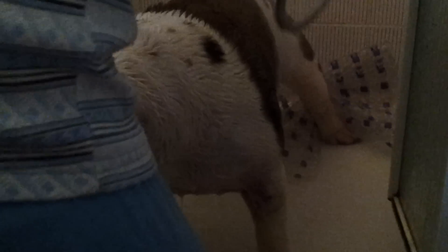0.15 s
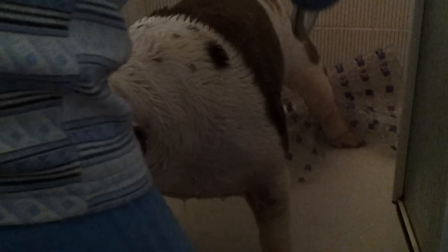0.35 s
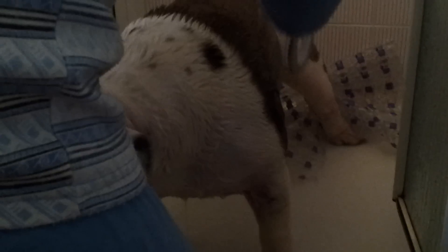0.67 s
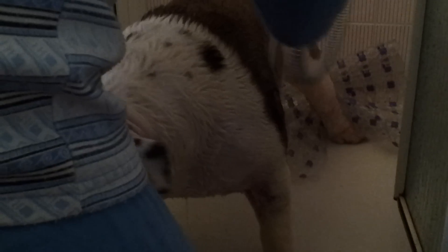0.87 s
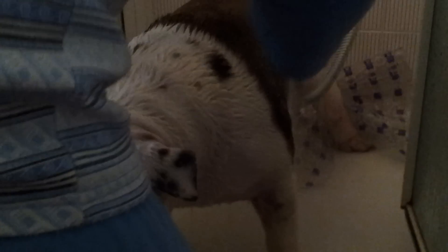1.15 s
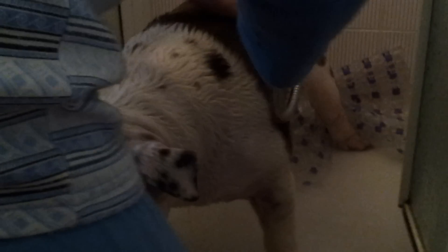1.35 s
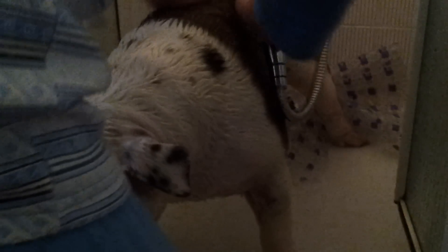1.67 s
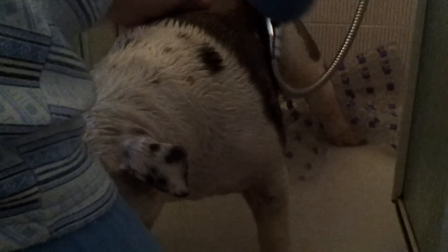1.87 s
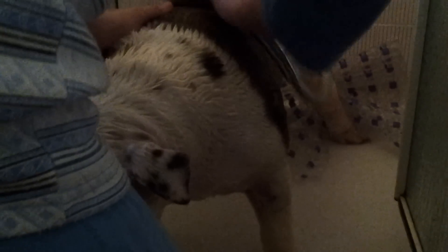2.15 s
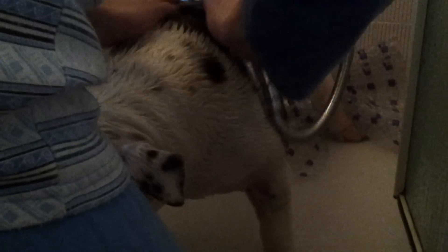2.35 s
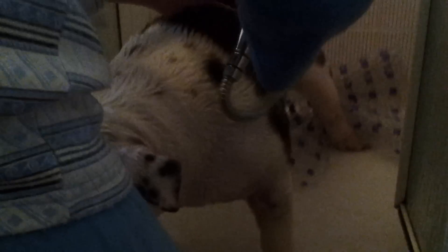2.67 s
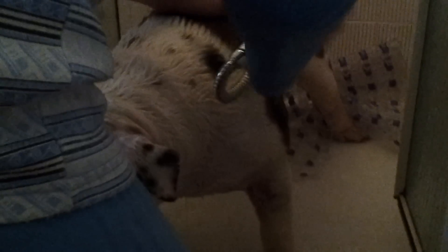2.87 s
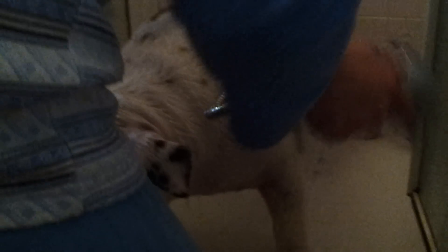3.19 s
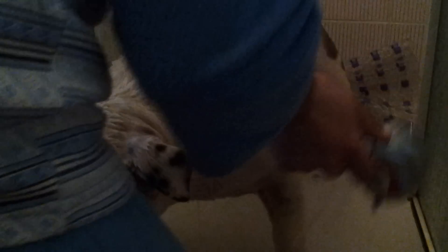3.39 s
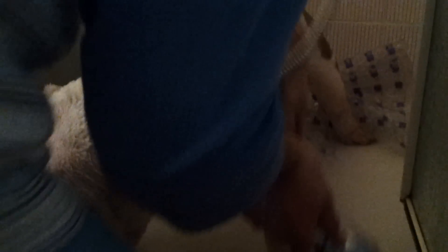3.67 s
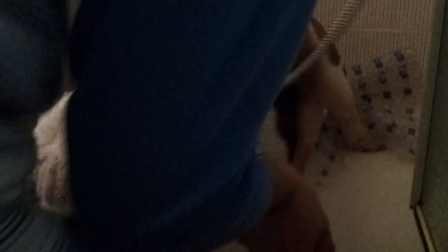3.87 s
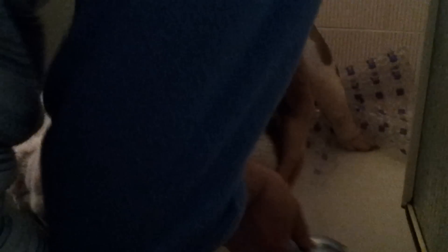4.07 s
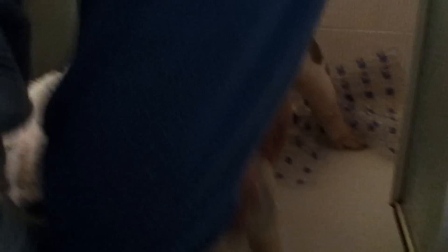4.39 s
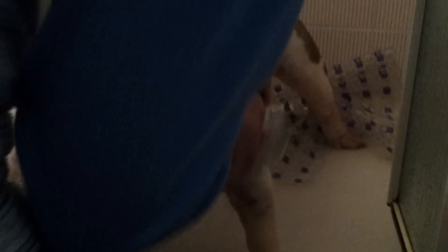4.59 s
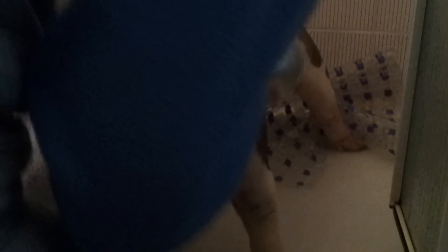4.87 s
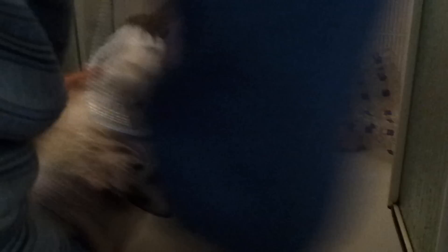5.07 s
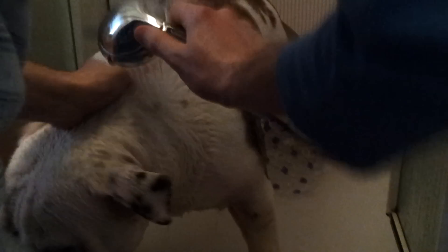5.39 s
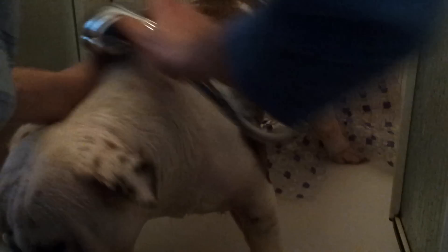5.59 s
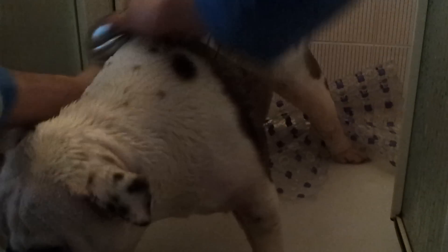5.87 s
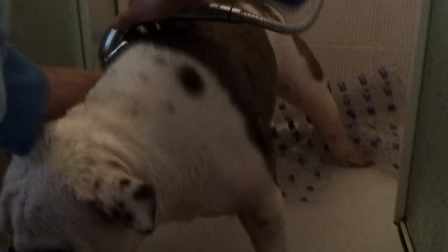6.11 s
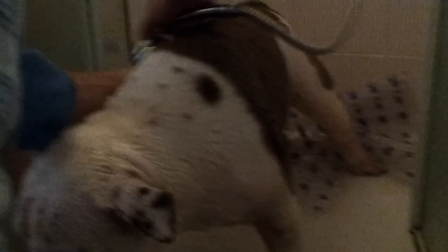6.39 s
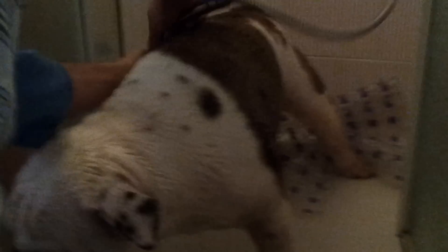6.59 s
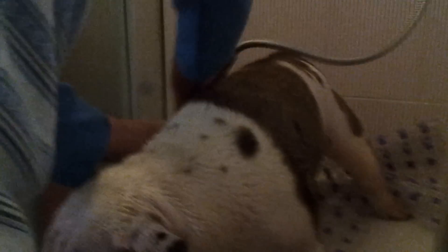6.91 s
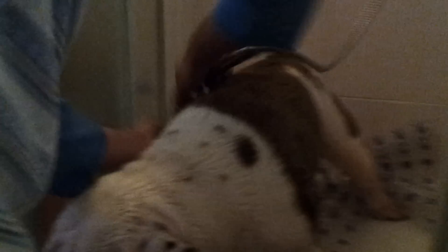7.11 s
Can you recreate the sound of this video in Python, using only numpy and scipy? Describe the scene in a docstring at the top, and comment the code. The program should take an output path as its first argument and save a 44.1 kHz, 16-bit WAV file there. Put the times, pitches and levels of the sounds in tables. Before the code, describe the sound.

In a small, hard tiled shower stall, a hand shower sprays a wet dog close to a narrow-band mono microphone. A dense, bright hiss runs throughout, rising and dipping as the jet moves. From 0 to 0.5 s sharp drops spit and crackle, with a soft low handling bump near 0.3. Around 0.8 to 2 s the coat splash grows, a narrow singing tone colours the spray and water gushes onto the tray, strongest near 1.2. More spits fall at 1.4 to 2.1; splash swells at 2.8 and 3.4. At 3.8 s the shower head knocks loudly: a hard, overloaded crack, hollow panel ring and boom, with weaker rebounds until 3.9. Spraying continues, with a drumming gush near 4.5, quieter swishes after 5, and a fuller splash at 6.4 with light spatters to the end at about 7.2. Gurgling run-off lies underneath.

```python
"""In a small tiled stall, a hand shower sprays a dog close to a mono microphone.
Fine drops hiss and the wet coat splashes: both are random impacts plus short rings, coloured by a spectrum.
Hollows in the coat swish and run-off gurgles as moving resonances; water drums on the tray, at times in a gush.
Large drops spit as short tones, droplets spatter as fading noise, and soft low bumps are short swelling tones.
Once the shower head knocks hard against the stall and rebounds: a noise crack, ringing panel tones and a boom."""
import sys
import numpy as np
from scipy import signal
from scipy.io import wavfile

SR = 44100
rng = np.random.default_rng(int(sys.argv[2]) if len(sys.argv) > 2 else 0)


def dump_mix(stems):
    """Bounce the given channels to the path in sys.argv[1] as a 16-bit WAV at rate SR."""
    frames = np.atleast_2d(stems).T  # one column per channel
    limited = np.clip(frames, -1, 1)  # hard clip at full scale
    pcm = np.round(limited * 32767).astype(np.int16)
    wavfile.write(sys.argv[1], SR, pcm)


N = 319512
TIME = np.arange(N) / SR


def amp(db):
    """Turns decibels into a plain gain."""
    return 10 ** (np.asarray(db) / 20)


def unit(x):
    """Scales to rms 1."""
    return x / np.sqrt(np.mean(x ** 2) + 1e-20)


def read(points, hz):
    """Reads a frequency table on a log-frequency axis."""
    f, value = np.transpose(points)
    return np.interp(np.log(hz + 1), np.log(f), value)


def curves(rows):
    """Draws straight lines through each column of a time table."""
    s, *columns = np.transpose(rows)
    return [np.interp(TIME, s, c) for c in columns]


def add(mix, s, sound):
    """Adds a sound to the mix, starting at s seconds."""
    part = mix[max(round(s * SR), 0):][:len(sound)]
    part += sound[:len(part)]


def colour(x, points, size=4096):
    """Filters to a spectrum without sounding early, so that clicks keep their sharp front."""
    log_gain = np.log(amp(read(points, abs(np.fft.fftfreq(size, 1 / SR)))))
    taps = np.fft.ifft(np.exp(np.conj(signal.hilbert(log_gain)))).real
    return signal.fftconvolve(x, taps[:size // 2])[:len(x)]


def low_pass(x, hz):
    """Steeply removes what lies above hz."""
    taps = signal.firwin(301, hz, window=("kaiser", 9), fs=SR)
    return signal.oaconvolve(x, taps[None], "same")


def resonate(x, hz, width_hz):
    """A two-stage resonance that follows the pitch hz."""
    turn = np.exp(2j * np.pi * np.cumsum(hz * np.ones(len(x))) / SR)
    r = np.exp(-np.pi * width_hz / SR)
    # shift the pitch down to zero, smooth, and shift it back up
    smooth = signal.lfilter([(1 - r) ** 2], [1, -2 * r, r * r], x / turn)
    return (turn * smooth).real


def drops(per_s, spread_db, mist):
    """Impacts of random moment and size over a mist too fine to tell apart."""
    size = amp(spread_db * np.minimum(rng.exponential(1, N), 4))
    hits = size * rng.choice([-1, 1], N) * (rng.random(N) < per_s / SR)
    return unit(unit(hits) + mist * rng.standard_normal(N))


def plinks(per_s, low_hz, high_hz, cycles, spread_db, size=600):
    """Each drop rings for a few cycles at a pitch of its own."""
    count = int(per_s * N / SR)
    when, pitch, chance, phase = rng.random((count, 4)).T[:, :, None]
    hz, k = low_hz + (high_hz - low_hz) * pitch, np.arange(size)
    height = amp(spread_db * np.minimum(-np.log(1 - chance), 4)) * np.sqrt(hz)
    turns = (hz * k / SR).astype(np.float32)
    fade = np.minimum(turns, 1) * np.exp(-turns / cycles) * (1 - k / size)
    rings = height * fade * np.sin(2 * np.pi * (turns + phase.astype(np.float32)))
    places = (when * N).astype(int) + k
    return unit(np.bincount(places.ravel(), rings.ravel())[:N])


def flutter(x, patch_db, bins, frames, size):
    """Random patches, bins wide and frames long, make the sound louder or softer."""
    overlap = size - size // 4
    z = signal.stft(x, nperseg=size, noverlap=overlap)[2]
    blob = np.outer(np.hanning(bins), np.hanning(frames))
    patches = unit(signal.fftconvolve(rng.standard_normal(z.shape), blob, "same"))
    return unit(signal.istft(z * amp(patch_db * patches), nperseg=size, noverlap=overlap)[1][:N])


# shares of a swell's length spent rising and falling
RISE_SHARE, FALL_SHARE = 0.27, 0.5


def swells(rows):
    """Gain that rises, holds and falls once for each row (time [s], length [s], level [dB])."""
    gain = np.zeros(N)
    for s, length, db in rows:
        u = np.linspace(0, 1, max(round(length * SR), 2))
        ramp = np.clip(np.minimum(u / RISE_SHARE, (1 - u) / FALL_SHARE), 0, 1)
        add(gain, s, amp(db) * np.sin(np.pi / 2 * ramp))
    return gain


def waver(low_hz, high_hz, count=24):
    """Random unsteadiness from a sum of slow waves, rms 1."""
    t = np.linspace(0, N / SR, 1500)
    rates = np.geomspace(low_hz, high_hz, count)
    drift = sum(np.sin(2 * np.pi * (hz * t + rng.random())) / np.sqrt(hz) for hz in rates)
    return unit(np.interp(TIME, t, drift))


# how long the tiled stall rings: (frequency [Hz], time to fall by 60 dB [s])
STALL_RING = [(100, 1), (300, 0.55), (1000, 0.56), (2500, 0.83), (8000, 0.14)]


def stall_tail():
    """Dense echoes off the tiles, each band dying at its own speed; energy 1."""
    echoes = rng.choice([-1., 1.], SR) * (rng.random(SR) < .2)
    hz, t, z = signal.stft(echoes, SR, nperseg=256)
    fade = amp(-60 * t / read(STALL_RING, hz)[:, None])
    tail = signal.istft(z * fade, SR, nperseg=256)[1]
    return tail / np.linalg.norm(tail)


def in_stall(x, wet_db):
    """Direct sound plus the ring of the stall, scaled to keep about the same power."""
    ring = signal.fftconvolve(x, stall_tail())[:N]
    return (x + amp(wet_db) * ring) / np.hypot(1, amp(wet_db))


# colour of the fine drops, also used for spits and spatters: (frequency [Hz], relative level per Hz [dB])
HISS_COLOUR = [(400, -40.5), (900, -14), (1400, -16), (1900, -3), (2300, -6), (2800, -10), (3300, -6.5),
               (4000, -2.5), (5000, -2), (6300, 1), (7000, -1.5), (7500, -9.5), (8000, -25), (8500, -24),
               (9200, -38)]
# colour of the splash in the wet coat: (frequency [Hz], relative level per Hz [dB])
SPLASH_COLOUR = [(300, -36), (520, -24), (800, -12), (1100, -5), (1600, 0), (2100, -7.5), (2700, -6.5),
                 (4000, -9), (7000, -26), (9000, -60.5)]
# the jet's fine hiss as the shower head moves: (time [s], level [dB])
JET_LEVEL = [(0, -26), (0.6, -26.5), (0.95, -27), (1.3, -23.5), (1.58, -28), (2.02, -26.5), (2.2, -29.5),
             (2.5, -29), (2.98, -27), (3.4, -24), (3.72, -25.5), (3.93, -24), (4.6, -28), (5.18, -27.5),
             (5.75, -29), (6.3, -29.3), (6.45, -26), (7.25, -27)]
# the jet sweeps past the dog onto bare tile: (time [s], length [s], hiss level [dB])
TILE_SWEEPS = [(.02, 0.054, -29.5), (1.19, 0.12, -24), (1.66, .09, -24.5), (2.5, 0.087, -31.5),
               (2.68, 0.089, -27.5), (3.11, 0.081, -25.5), (6.02, 0.2, -30), (6.34, 0.057, -26),
               (6.83, 0.066, -27.5)]
# the splash in the coat, before a small trim: (time [s], level [dB])
COAT_LEVEL = [(0.0, -42.0), (1.03, -34.5), (1.4, -34), (1.83, -41), (2.55, -43), (2.8, -32.5),
              (3.18, -40.5), (3.4, -31.5), (3.55, -45.5), (3.68, -48), (3.85, -41), (4.3, -40.5),
              (4.45, -36.5), (4.85, -38.5), (5.33, -34), (6.38, -36), (6.45, -30.5), (7.25, -36.5)]


def spray(hiss_plink_db=-10.0, splash_plink_db=-7, splash_trim_db=-.5, unsteady_db=0.23):
    """Many small impacts hiss, and the wet coat splashes and bubbles at lower pitches."""
    hiss = drops(per_s=4000, spread_db=2.0, mist=1.0)
    hiss = hiss + amp(hiss_plink_db) * plinks(1100, 2533, 8027, cycles=14, spread_db=2.5)
    hiss = flutter(colour(hiss, HISS_COLOUR), patch_db=0.97, bins=23, frames=27, size=512)

    splash = drops(per_s=2500, spread_db=2.5, mist=.9)
    splash = splash + amp(splash_plink_db) * plinks(800, 620, 4017, cycles=9, spread_db=1.0)
    splash = flutter(colour(splash, SPLASH_COLOUR), patch_db=1.2, bins=8, frames=29, size=512)

    # finer random patches stand in for the shifting echoes off the close walls
    hiss = flutter(hiss, patch_db=1.5, bins=10, frames=30, size=2048)
    splash = flutter(splash, patch_db=3.0, bins=5, frames=30, size=2048)

    hiss_gain = np.hypot(amp(curves(JET_LEVEL)[0]), swells(TILE_SWEEPS))
    splash_gain = amp(curves(COAT_LEVEL)[0] + splash_trim_db)
    return (hiss * hiss_gain + splash * splash_gain) * amp(unsteady_db * waver(5, 25))


# the jet crosses a hollow of coat or hand, levels before trim and stall ring:
# (time [s], length [s], first pitch [Hz], last pitch [Hz], level [dB])
HOLLOWS = [(0.41, 0.011, 3020, 3120, -21.5), (0.437, 0.07, 1350, 1160, -35.5),
           (0.79, 0.046, 1800, 1630, -36.5), (1.25, 0.14, 1300, 835, -34),
           (1.418, 0.067, 1260, 1340, -33.5), (1.488, 0.082, 334, 550, -43.5),
           (1.581, 0.046, 1490, 1900, -32), (1.67, 0.023, 1360, 1160, -32.5),
           (2.042, 0.021, 3480, 3600, -25), (2.948, 0.1, 680, 796, -39.5), (3.237, 0.052, 630, 870, -40),
           (3.245, 0.088, 2560, 1720, -34.5), (3.347, .12, 815, 1090, -33),
           (3.378, 0.08, 1250, 1900, -30.5), (3.64, 0.081, 1530, 1730, -31.5),
           (4.398, 0.049, 1070, 1520, -32), (4.486, 0.064, 1400, 1900, -31),
           (5.115, 0.17, 1850, 1400, -32.5), (5.364, 0.075, 756, 836, -38.5),
           (5.792, 0.1, 1080, 1210, -40.5), (6.016, 0.071, 1880, 2850, -31), (6.06, 0.15, 597, 640, -46),
           (6.108, 0.11, 1550, 1370, -36), (6.396, 0.055, 1090, 990, -31.5),
           (6.44, 0.08, 1410, 1870, -30.5), (6.554, 0.07, 700, 1110, -33.5),
           (6.948, 0.043, 1430, 1750, -33), (7.075, 0.029, 1650, 1950, -30)]


def swishes(width_share=0.28, trim_db=-3.5):
    """Drops ring a small hollow whose size changes as the jet moves over it."""
    out, water = np.zeros(N), drops(per_s=1200, spread_db=1, mist=0.51)
    for s, length, first_hz, last_hz, db in HOLLOWS:
        part = water[round(s * SR):][:max(round(length * SR), 20)]
        # a smaller hollow has a higher pitch
        pitch = np.geomspace(first_hz, last_hz, len(part))
        ring = resonate(part, pitch, width_share * first_hz)
        add(out, s, amp(db + trim_db) * unit(ring * signal.windows.tukey(len(part), .7)))
    return in_stall(out, wet_db=-7.5)


# large drops spit, levels before trim and stall ring: (time [s], level [dB], pitch [Hz])
LARGE_DROPS = [(0.086, -14, 5100), (0.0988, -6.5, 5800), (0.2015, -11, 3300), (0.2612, -11.5, 5400),
               (0.338, -11.5, 6400), (0.3574, -5.5, 5640), (0.4378, -7.5, 4600), (0.4423, -9, 4760),
               (0.4984, -11, 5370), (1.219, -7, 6100), (1.3923, -8.5, 5600), (1.469, -13, 6400),
               (1.522, -11, 5800), (1.929, -15, 6000), (1.9327, -5.5, 5960), (2.0494, -11, 3630),
               (2.075, -14.5, 5400), (2.5096, -14, 6400), (3.299, -10, 4100), (3.499, -11, 4840),
               (3.667, -9.5, 3860), (4.6748, -13, 5670), (4.7705, -11.5, 4160), (6.3628, -14, 5160)]


def spits(ring_s=0.0011, scatter_s=0.0071, scatter=0.099, trim_db=1.5, rise_cycles=2.2):
    """A large drop snaps with a few cycles, while a faint scatter of droplets fades more slowly."""
    out, t = np.zeros(N), np.arange(SR // 20) / SR
    for s, db, hz in LARGE_DROPS:
        rise = np.minimum(t * hz / rise_cycles, 1)
        snap = np.sin(2 * np.pi * hz * t) * np.exp(-t / ring_s) * rise
        droplets = unit(colour(rng.standard_normal(len(t)), HISS_COLOUR)) * np.exp(-t / scatter_s)
        add(out, s, amp(db + trim_db) * (snap + scatter * droplets))
    return in_stall(out, wet_db=-15.5)


# the jet flicks droplets against the tiles, levels before trim and stall ring:
# (time [s], level [dB], decay time [s])
DROPLET_BURSTS = [(.2, -23, 0.0081), (.223, -15.5, 0.0048), (.386, -17, .008), (1.013, -18, 0.008),
                  (1.04, -16, 0.0047), (1.392, -13.5, 0.0044), (1.412, -17, 0.0097), (1.929, -17.5, 0.012),
                  (2.509, -23, .008), (3.297, -20, 0.007), (3.326, -16.5, .007), (3.659, -18.5, 0.0084),
                  (4.63, -24, .0066), (6.536, -17, 0.007), (6.708, -21.5, 0.011), (6.977, -21, 0.0082)]


def spatters(trim_db=-3.0):
    """A handful of droplets lands at once and fades away."""
    out, t = np.zeros(N), np.arange(SR // 10) / SR
    water = unit(colour(drops(per_s=7300, spread_db=1, mist=1), HISS_COLOUR))
    for s, db, decay_s in DROPLET_BURSTS:
        burst = water[round(s * SR):][:len(t)] * np.exp(-t / decay_s)
        add(out, s, amp(db + trim_db) * burst)
    return in_stall(out, wet_db=-12.0)


# the knock and its rebounds, levels before trim: (time [s], crack level [dB], panel ring level [dB])
KNOCK_HITS = [(3.798, 0.5, 0.5), (3.822, -9, -24), (3.873, -10, -20), (3.909, -15, -34)]
# tones of the stall panel: (frequency [Hz], relative level [dB], time to fall by 60 dB [s])
PANEL_TONES = [(79.4, -34, 0.41), (112, -30, 0.72), (184.3, -27.5, 0.91), (202.4, -28.5, 0.97),
               (243, -18.5, 0.75), (263, -16, 0.61), (289, -14, 0.44), (347, -23, 0.6), (371, -18, 0.23),
               (435, -19.5, 0.19), (491, -26, 0.39), (514, -28, 0.53), (610, -26, 0.29), (717, -22, 0.28),
               (810, -30, 0.27), (889, -12.5, 0.15), (931, -17, 0.35), (1324, -26, 0.37), (1700, -32, 0.45),
               (1840, -16.5, 0.25), (2220, -26, 0.62), (2034, -20.5, 0.42)]
# colour of the hard crack: (frequency [Hz], relative level per Hz [dB])
CRACK_COLOUR = [(100, -42), (400, -33), (650, -6), (880, -2), (1200, -10.5), (2100, 2.5), (2800, -8),
                (3600, -5), (5000, -8), (7000, -4.5), (9000, -44)]
# colour of the stall's boom: (frequency [Hz], relative level per Hz [dB])
BOOM_COLOUR = [(40, -19), (70, -16.5), (150, -11), (260, -5.5), (500, -0.5), (700, -3.5), (900, -5),
               (1100, -12), (1400, -5), (2100, -15.5), (2700, -15.5), (4000, -15.5), (7000, -26),
               (9000, -59)]


def knock(crack_db=-8, crack_s=0.0097, boom_db=-20, rise_s=0.0033, panel_db=-3.0):
    """A hard crack, the panel's fading tones, and one stall boom from the first hit."""
    out, t = np.zeros(N), np.arange(SR) / SR
    swell = 1 - np.exp(-t / rise_s)
    # tones next to each other start in opposite directions, so the low ring builds up and beats
    panel = np.zeros(SR)
    for k, (hz, db, t60) in enumerate(PANEL_TONES):
        panel += (-1) ** k * amp(db - 60 * t / t60) * np.sin(2 * np.pi * hz * t)
    panel = swell * panel
    for s, sharp_db, ring_db in KNOCK_HITS:
        crack = unit(colour(rng.standard_normal(SR), CRACK_COLOUR)) * np.exp(-t / crack_s)
        add(out, s, amp(crack_db + sharp_db) * crack + amp(panel_db + ring_db) * panel)
    boom = colour(stall_tail(), BOOM_COLOUR)[:SR]
    add(out, KNOCK_HITS[0][0], amp(boom_db) * swell * boom / boom[:SR // 20].std())
    return out


# steady flow off the dog onto the tray, before trim: (time [s], level [dB])
TRAY_FLOW = [(0.0, -51.5), (0.68, -54), (1.35, -49), (2.3, -55.5), (2.93, -56.5), (3.55, -53), (4.28, -52),
             (4.48, -45.5), (5.25, -59), (5.55, -50), (6.03, -57.5), (7.25, -54)]
# pooled water gushes off the coat onto the tray:
# (time [s], length [s], drumming level [dB], rumble level [dB])
TRAY_GUSHES = [(0.726, 0.051, -45, -64), (0.844, 0.16, -51, -53), (1.149, 0.14, -36, -42),
               (1.246, 0.24, -59, -48), (1.49, .09, -53, -59), (1.7, 0.14, -47, -50),
               (3.582, .12, -42.5, -52), (4.302, 0.055, -46, -58), (4.478, .08, -42.5, -47),
               (4.86, 0.13, -46, -48), (5.386, .08, -42, -62), (7.16, .12, -48, -56)]
# colour of the drumming: (frequency [Hz], relative level per Hz [dB])
TRAY_COLOUR = [(60, -21), (160, -10.5), (210, -3.5), (260, 1), (320, -1), (390, -7.5), (480, -13.5),
               (800, -23.5), (2000, -45)]
# colour of the dull rumble: (frequency [Hz], relative level per Hz [dB])
RUMBLE_COLOUR = [(20, -18), (45, -10.5), (62, 5), (110, -3.5), (160, -5.5), (250, -19), (600, -45)]


def drumming(tray_trim_db=-.5, rumble_db=-60, rumble_follow=0.64):
    """Heavier drops drum over a dull rumble; both follow the flow and swell with each gush."""
    flow_db = curves(TRAY_FLOW)[0]
    tray = unit(colour(drops(per_s=290, spread_db=2.5, mist=.8), TRAY_COLOUR))
    rumble = unit(colour(drops(per_s=170, spread_db=2.5, mist=0.6), RUMBLE_COLOUR))
    s, length, tray_gush_db, rumble_gush_db = np.array(TRAY_GUSHES).T

    tray_gain = np.hypot(amp(flow_db + tray_trim_db), swells(zip(s, length, tray_gush_db)))
    # the rumble takes only part of the flow's ups and downs
    steady_db = rumble_db + rumble_follow * (flow_db - flow_db.mean())
    rumble_gain = np.hypot(amp(steady_db), swells(zip(s, length, rumble_gush_db)))
    return tray * tray_gain + rumble * rumble_gain


# run-off falling into shallow water, levels before trim: (time [s], pitch [Hz], level [dB])
GURGLE = [(0, 726, -41.5), (1.8, 718, -38), (2.2, 684, -46.5), (3.7, 748, -46.5), (4.6, 770, -39.5),
          (5.95, 556, -49.5), (6.45, 666, -41.5), (7.25, 740, -40.5)]


def runoff(trim_db=-9.0):
    """Water off the coat gurgles in a narrow band whose pitch wanders."""
    hz, db = curves(GURGLE)
    water = drops(per_s=370, spread_db=1.0, mist=0.57)
    return amp(db + trim_db) * unit(resonate(water, hz, width_hz=198))


# the jet dwells on a spot where a narrow band sings: (time [s], length [s], level [dB])
SINGING_SPOTS = [(.46, 0.39, -39), (.78, 0.7, -35.5), (1.3, .9, -40.5), (2.7, 0.17, -41), (4.05, 0.37, -41)]


def singing(idle_db=-48):
    """The spray excites one narrow resonance, strongly while the jet dwells on it."""
    water = drops(per_s=4000, spread_db=1, mist=0.98)
    gain = np.hypot(amp(idle_db), swells(SINGING_SPOTS))
    return gain * unit(resonate(water, 2053, width_hz=120))


# soft low bumps of the hand on the camera, levels before trim: (time [s], level [dB])
HAND_BUMPS = [(0.314, -38), (.36, -43.5), (1.58, -44), (1.69, -44), (1.78, -46), (2.509, -45), (3.14, -45),
              (3.33, -44), (4.17, -45), (4.77, -44), (5.41, -49), (6.92, -50)]


def bumps(middle_hz=58, swell_s=.011, trim_db=-1.5):
    """Dull pushes of the hand on the camera body: low tones that swell and die quickly."""
    out, t = np.zeros(N), np.arange(SR // 10) / SR
    for s, db in HAND_BUMPS:
        push = t / swell_s * np.exp(1 - t / swell_s)
        hz = middle_hz * 2 ** rng.uniform(-0.74, .5)  # each bump has its own pitch
        add(out, s, amp(db + trim_db) * push * np.sin(2 * np.pi * hz * t))
    return out


def scene():
    """All sounds summed, the same in both channels."""
    water = spray() + swishes() + spits() + spatters() + drumming() + runoff() + singing()
    mono = water + knock() + bumps()
    return np.array([mono, mono])


MIC_HZ, EDGE_HZ = 9050, 16000  # upper limits of the microphone and of the final sound


def record(dry):
    """A narrow-band microphone that overloads on loud peaks; then the band limit."""
    rounded = dry / (1 + (dry / .8) ** 6) ** (1 / 6)
    clipped = np.clip(low_pass(rounded, MIC_HZ), -.72, .72)
    return low_pass(clipped, EDGE_HZ)


dry = scene()
out = record(dry)
dump_mix(out)
```